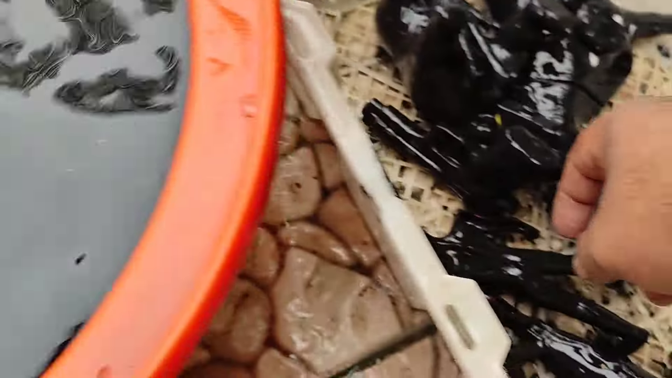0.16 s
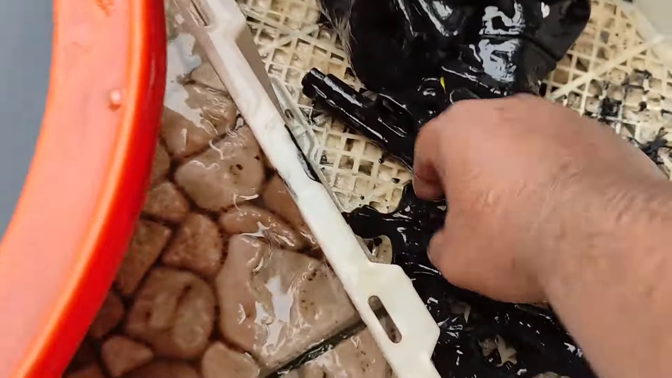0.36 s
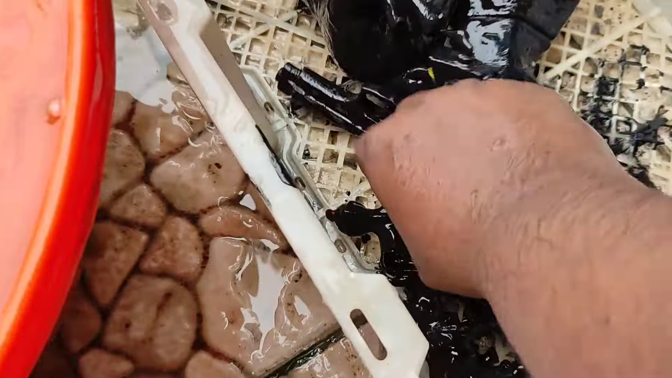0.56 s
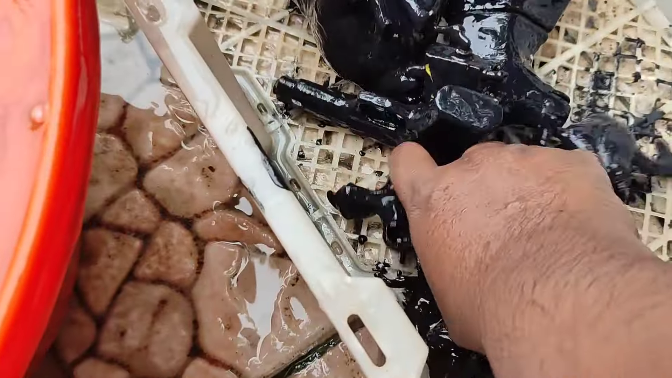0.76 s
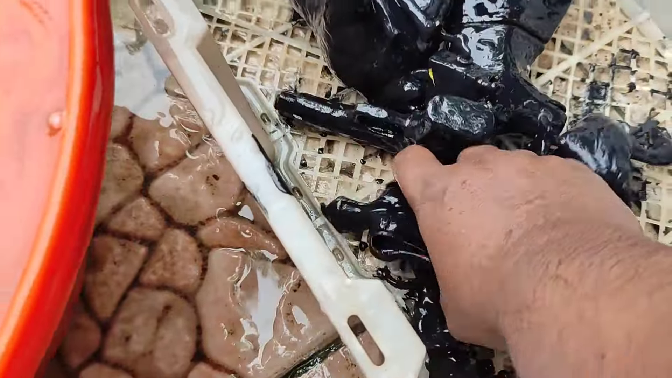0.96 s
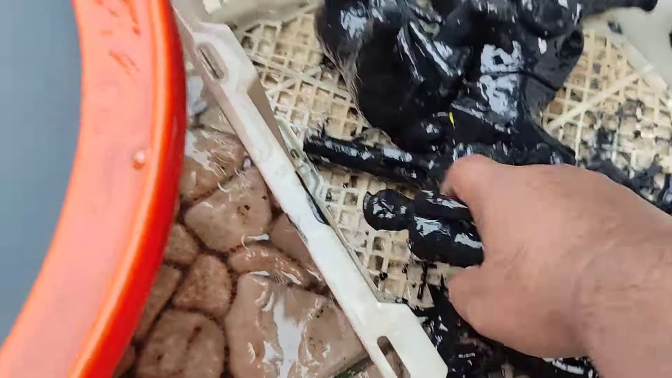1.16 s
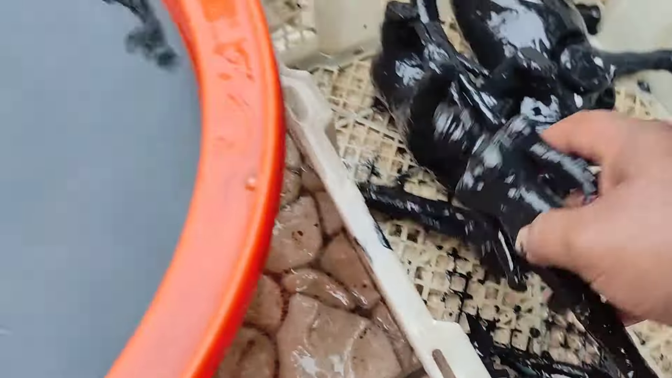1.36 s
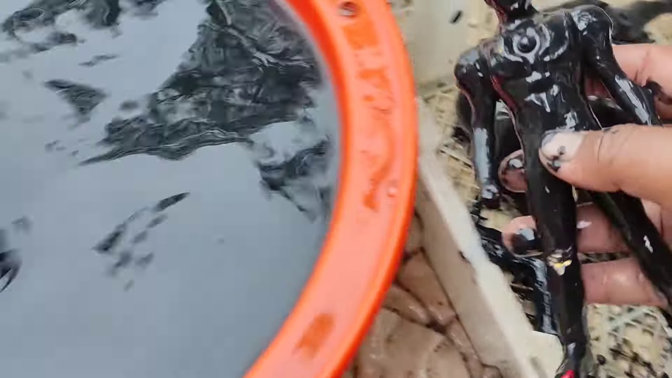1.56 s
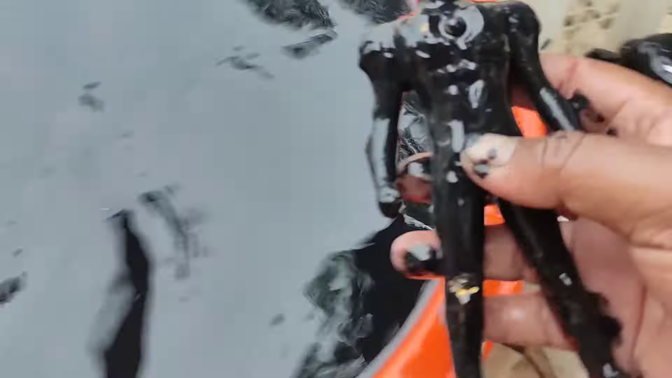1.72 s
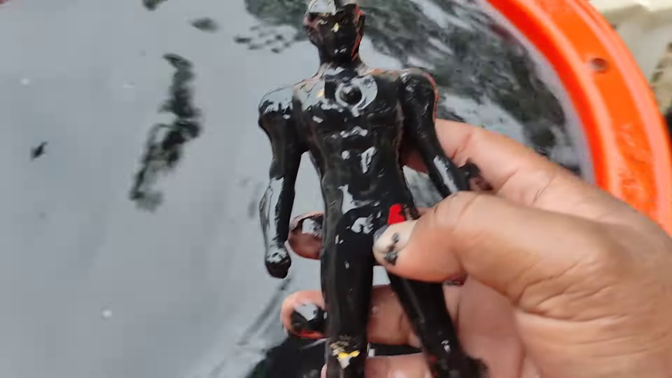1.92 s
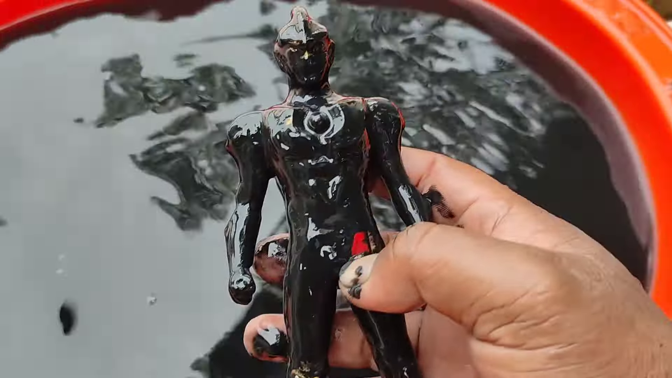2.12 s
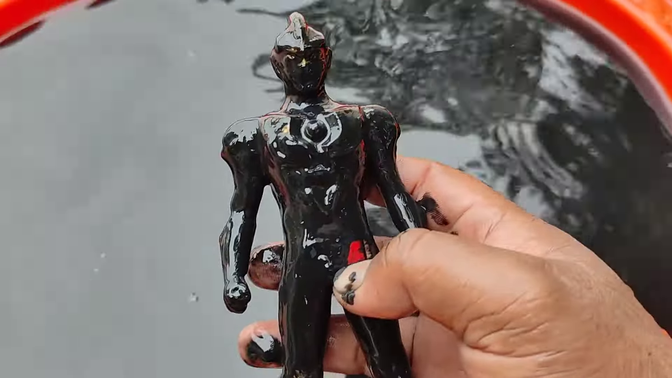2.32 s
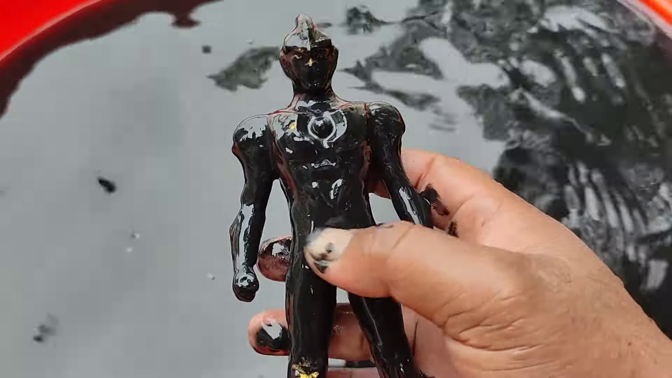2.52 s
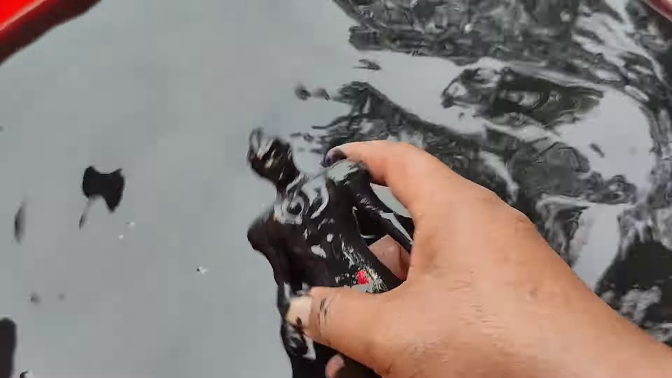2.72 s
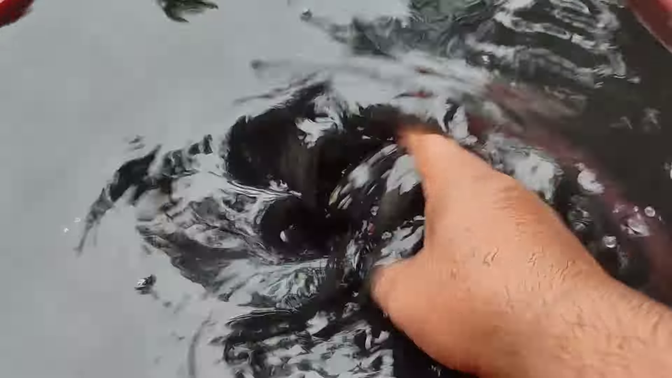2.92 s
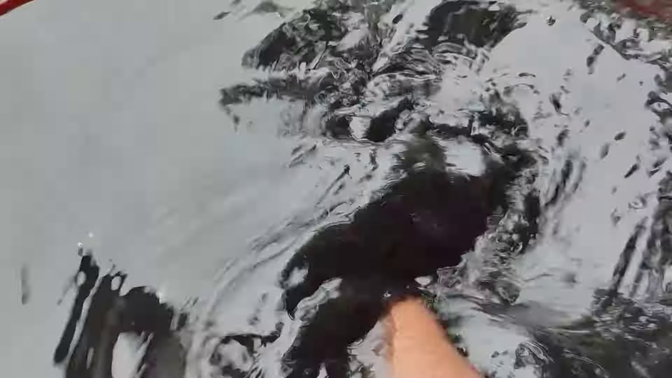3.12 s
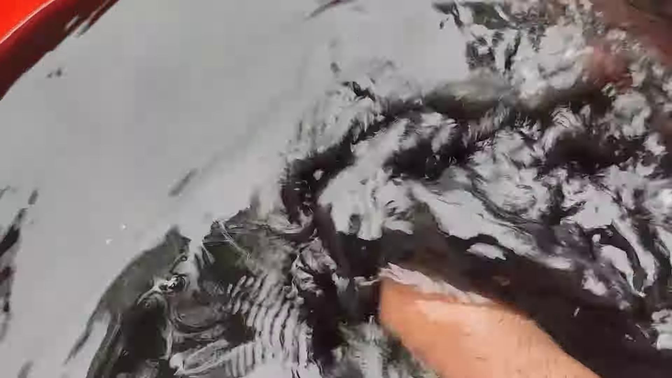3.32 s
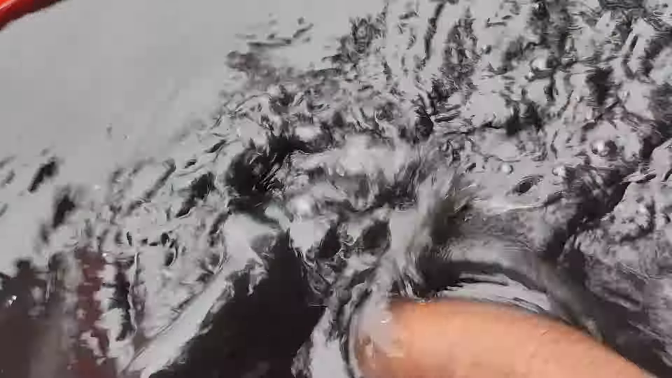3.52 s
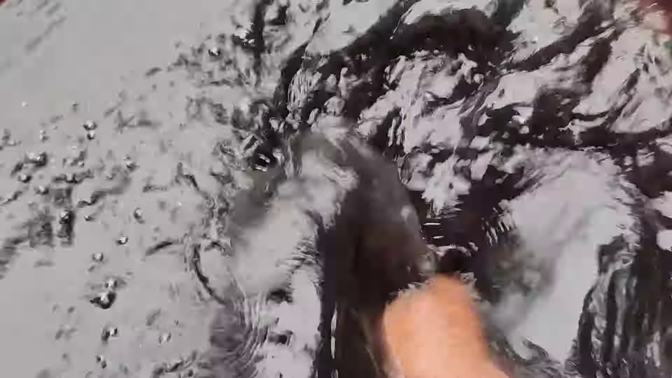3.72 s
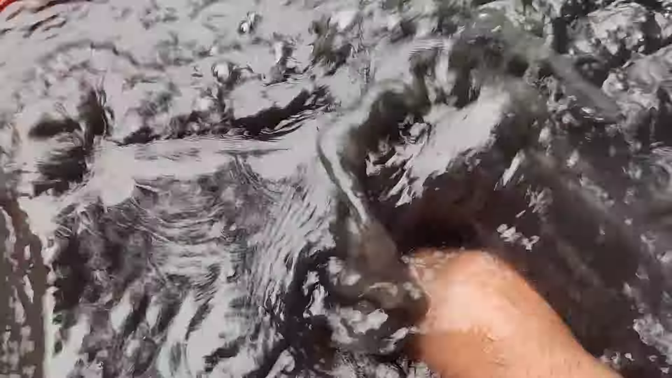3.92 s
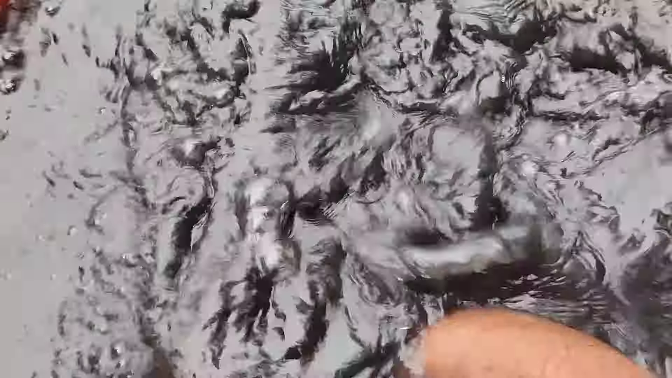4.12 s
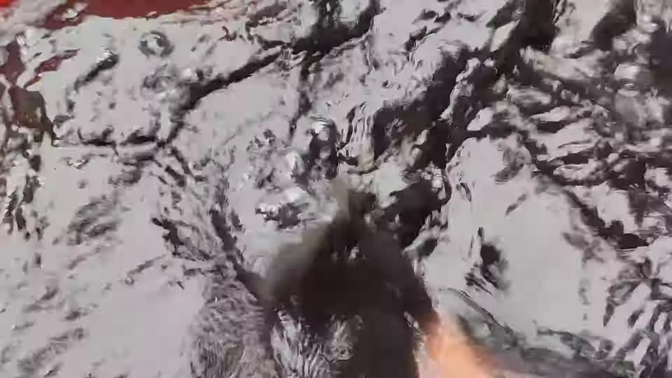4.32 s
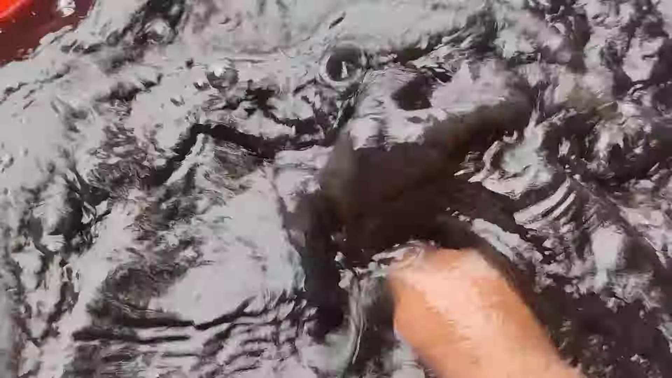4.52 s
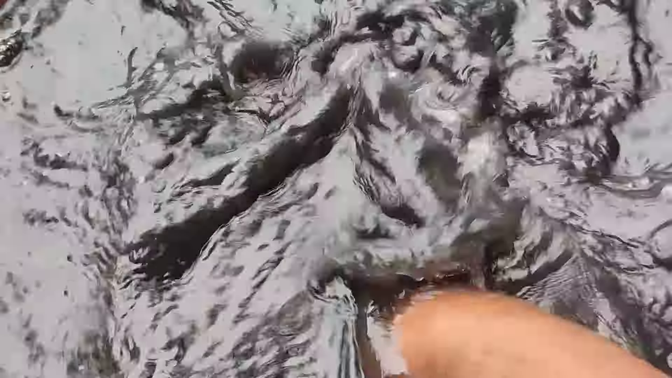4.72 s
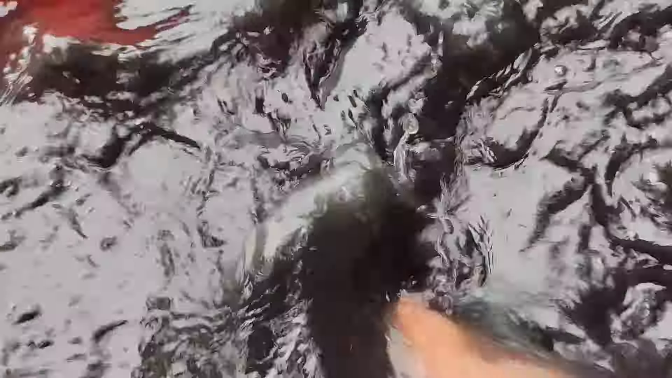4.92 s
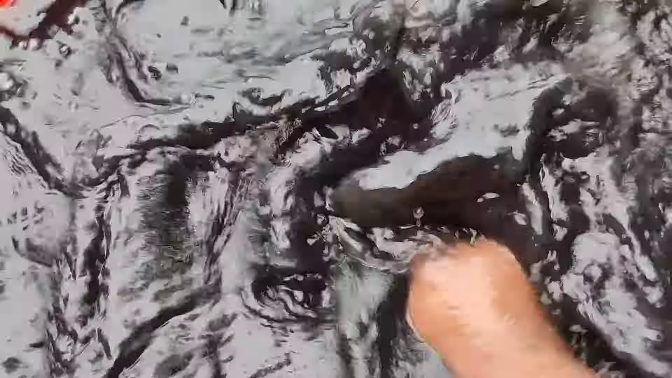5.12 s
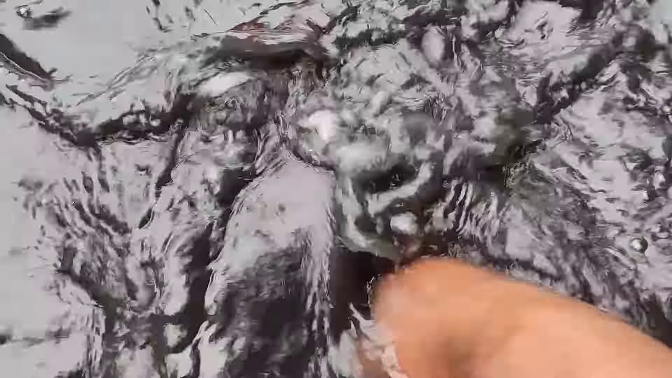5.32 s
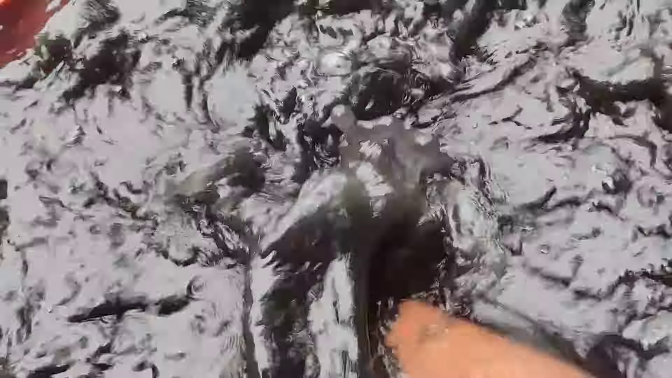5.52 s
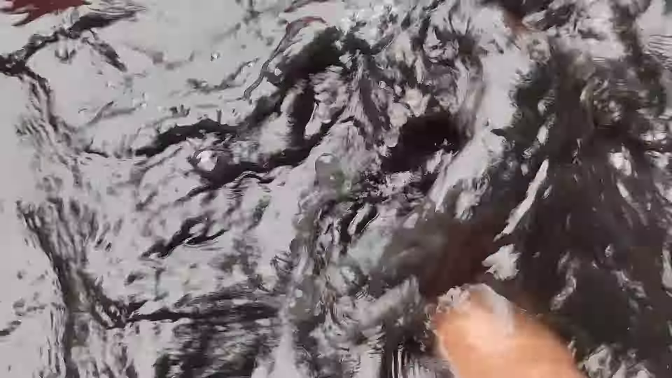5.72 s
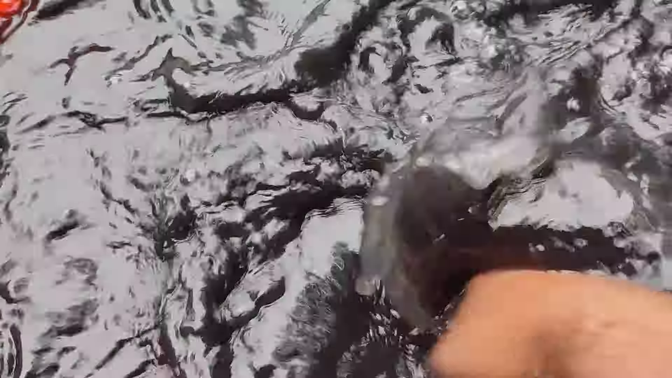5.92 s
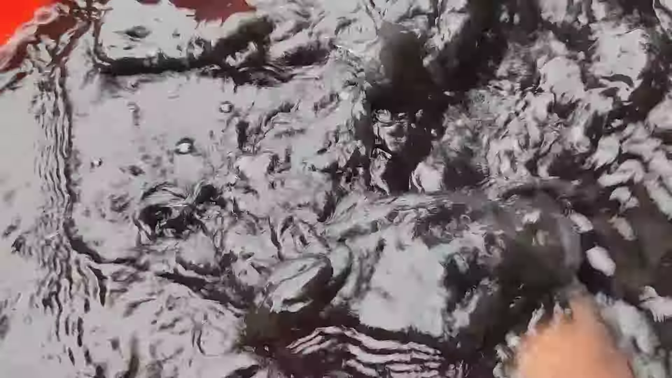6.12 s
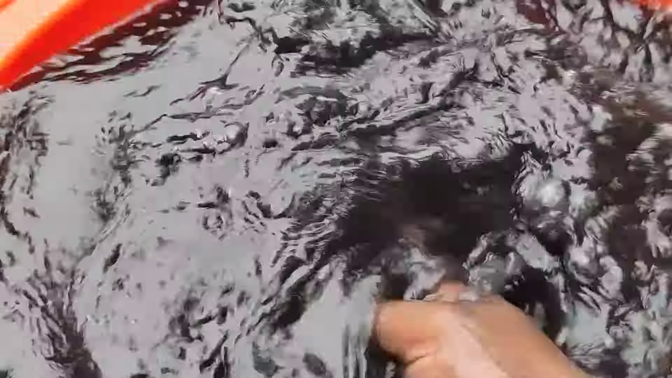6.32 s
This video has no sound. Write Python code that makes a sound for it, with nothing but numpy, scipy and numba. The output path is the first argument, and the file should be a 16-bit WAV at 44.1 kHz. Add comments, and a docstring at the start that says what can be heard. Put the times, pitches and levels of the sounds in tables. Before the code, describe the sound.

A wet plastic toy scrapes and knocks out of a crate, then is vigorously swished through a basin of water with splashes and bubbling gurgles.

```python
"""Wet toy, crate and basin

A hand lifts a wet plastic toy out of a crate, which scrapes and knocks as decaying modes, then swishes it
through a basin: trapped air rings as gliding sines, droplets tick as noise bursts, spray fizzes as tiny grains.
Outdoors: low town rumble of banded noise, a far engine of sine orders pulling away, faint whistling birds.
Two close ports hear it with differences in level that change strongly with frequency, and small delays."""
import sys
import numpy as np
from scipy import signal
from scipy.io import wavfile
from scipy.ndimage import map_coordinates
from numba import njit

SR = 44100
rng = np.random.default_rng(int(sys.argv[2]) if len(sys.argv) > 2 else 0)


def unload_wav(signal):
    """Save mono or channel-first audio to the path in sys.argv[1] as 16-bit WAV at rate SR, clipped to [-1, 1]."""
    wavfile.write(
        sys.argv[1],
        SR,
        np.round(np.clip(np.atleast_2d(signal).T, -1, 1) * 32767).astype(np.int16),
    )


N = 284930

# large air pockets: start_s, level_db, pitch_hz, glide_octaves_per_s, ring_cycles (to fall 20 dB)
POCKETS = [(2.948, -27, 1210, -14, 6.5), (2.951, -32.5, 760, -3, 10), (2.994, -32, 1330, -5, 18),
           (3.037, -30, 2260, 9, 26), (3.059, -21.5, 1505, 8, 17), (3.063, -26, 1000, 18, 32),
           (3.084, -21.5, 1180, 15, 38), (3.096, -29, 1540, 16, 18), (3.098, -34, 680, -18, 5),
           (3.118, -36, 744, 0, 5), (3.187, -32.5, 815, -6, 13), (3.189, -27.5, 2230, 2, 10),
           (3.207, -27.5, 675, 5, 8), (3.23, -29.5, 793, -5, 27), (3.254, -30, 458, -37, 9),
           (3.267, -30, 700, 17, 21), (3.281, -39, 735, 19, 20), (3.405, -31, 1480, 2, 7),
           (3.452, -30, 357, 6, 20), (3.475, -17, 1000, 18, 20), (3.529, -33.5, 780, -14, 9),
           (3.531, -33, 2160, -3, 22), (3.576, -37.5, 645, 5, 22), (3.619, -20, 539, 19, 16),
           (3.777, -29.5, 1860, 46, 20), (3.814, -30, 1210, 1, 24), (3.831, -32, 617, 1, 14),
           (3.849, -26, 652, 35, 12), (3.853, -20.5, 1370, 22, 4.5), (3.927, -7, 623, 9, 17),
           (3.914, -26, 770, 3, 12), (3.947, -32, 1370, 35, 34), (3.968, -34, 620, 27, 9),
           (4.0, -22, 1700, 21, 25), (4.069, -20.5, 860, 12, 16), (4.07, -14.5, 1450, 45, 9.5),
           (4.127, -30.5, 683, 11, 22), (4.138, -26, 736, 8, 6), (4.264, -24, 860, 15, 10.5),
           (4.3, -46, 643, -3, 20), (4.344, -36.5, 960, 10, 15), (4.36, -36, 728, 22, 28),
           (4.362, -34, 1400, 8, 16), (4.398, -33, 890, 12, 4), (4.409, -35, 900, 10, 4),
           (4.619, -40, 1210, 6, 22), (4.685, -44, 930, -8, 32), (4.749, -38.5, 2140, 24, 22),
           (4.438, -30.5, 1990, 1, 15), (4.465, -43, 794, -2, 46), (4.515, -30, 1333, 10, 38),
           (4.641, -37.5, 910, -7, 31), (4.72, -37.5, 782, 9, 23), (4.822, -25, 1000, 31, 12.5),
           (4.845, -34, 1500, 9, 30), (4.848, -34, 860, 13, 25), (4.906, -36.5, 1155, 5.5, 39),
           (4.995, -26.5, 732, 17, 15), (4.998, -23, 2600, 3, 8), (5.287, -20, 1470, 12, 5.5),
           (5.33, -34, 2580, 8, 23), (5.908, -26.5, 2100, 31, 21), (5.68, -30, 1840, 13, 10),
           (4.277, -34.5, 2220, 0, 30), (5.036, -21, 1710, 23, 15), (5.029, -25, 1350, 0.5, 11),
           (5.037, -13.5, 1267, -29, 19.5), (5.055, -32, 479, -11, 32), (5.06, -29, 970, 4, 36),
           (5.085, -34, 390, 21.5, 26), (5.118, -30, 1000, 31, 18), (5.118, -25.5, 1640, 25, 15),
           (5.23, -37, 756, 13.5, 27), (5.251, -29, 1700, 8, 17), (5.289, -18.5, 750, 26, 19.5),
           (5.357, -25, 370.4, 18, 17), (5.399, -21.5, 680, 16, 28), (5.405, -17, 718, 3, 13),
           (5.385, -24, 624, 16.5, 17), (5.42, -31, 757, 18, 18), (5.469, -26.5, 1585, -11, 24),
           (5.547, -24, 702, 73, 10), (5.552, -17, 1290, 32, 16), (5.563, -20, 459, 0.5, 10.5),
           (5.59, -28, 362, 4, 25), (5.651, -28.5, 872, -1.5, 19), (5.794, -36, 1000, 1, 11),
           (5.858, -30, 1480, 3, 5), (5.901, -18.5, 1075, -3.5, 28), (5.956, -26, 1780, -12, 21),
           (5.954, -27, 420, -6, 21.5), (6.007, -31.5, 1190, -11, 25), (6.107, -40.5, 1186, 9, 40),
           (6.37, -44, 500, 9.5, 37), (6.155, -33, 1940, 16, 24), (6.186, -34.5, 634, 7.5, 21),
           (6.252, -34.5, 1486, -3, 23), (6.255, -34.5, 704, -0.5, 52), (6.282, -27.5, 840, 14, 5),
           (6.294, -36, 1840, 18, 31), (6.302, -33, 464, 6, 22), (6.447, -33, 1250, 15.5, 25)]
# droplets and wet films that snap: start_s, level_db, centre_hz
SNAPS = [(0.7573, -36.5, 8600), (0.772, -29, 3020), (0.8508, -35, 4270), (0.884, -40, 3450),
         (1.092, -41, 3240), (1.137, -39, 3980), (1.151, -36, 4800), (1.1572, -33, 4400),
         (1.259, -52, 4470), (1.5413, -45, 3600), (1.5582, -39, 6400), (2.875, -40.5, 9300),
         (2.928, -30, 11350), (2.947, -34.5, 7060), (2.973, -30.5, 8800), (3.033, -34.5, 8200),
         (3.075, -41, 10620), (3.086, -22, 9700), (3.096, -19, 11700), (3.108, -19, 4670),
         (3.151, -24.5, 6200), (3.206, -26.5, 4040), (3.2473, -20.5, 6300), (3.254, -17, 5040),
         (3.263, -18.5, 3360), (3.446, -35, 4870), (3.461, -31.5, 4200), (3.474, -36, 9400),
         (3.522, -34.5, 9100), (3.532, -37, 8300), (3.617, -34, 3330), (3.622, -25, 8900),
         (3.8191, -30, 11000), (3.8503, -25.5, 8360), (3.8767, -30, 3630), (3.953, -25, 4400),
         (3.9607, -24, 4360), (4.001, -22.5, 9200), (4.0698, -23, 6500), (4.109, -44, 7740),
         (4.1603, -30.5, 6050), (4.233, -32, 8900), (4.25, -37, 8550), (4.2604, -27, 8270),
         (4.35, -29, 11400), (4.437, -38, 7500), (4.457, -34.5, 5200), (4.4868, -30.5, 7000),
         (4.515, -19.5, 8150), (4.529, -25.5, 5900), (4.604, -32, 6260), (4.613, -29, 5130),
         (4.692, -30.5, 4000), (4.802, -27, 10900), (4.81, -21.5, 9900), (4.822, -21, 11260),
         (4.909, -31, 4530), (4.996, -31, 3460), (5.0345, -29, 3580), (5.118, -19, 5570),
         (5.179, -26.5, 3130), (5.1903, -25.5, 8850), (5.213, -26, 8600), (5.2546, -24, 11300),
         (5.284, -27, 3820), (5.3557, -29, 9400), (5.399, -22.5, 8850), (5.407, -25, 4020),
         (5.525, -33, 8150), (5.581, -21, 8700), (5.5934, -28, 4350), (5.661, -30, 10600),
         (5.697, -14.5, 4500), (5.706, -24, 9300), (5.774, -34, 6010), (5.837, -31, 9000),
         (5.8818, -26.5, 11700), (5.904, -29.5, 8700), (5.954, -11, 10000), (6.133, -32.5, 2930),
         (6.142, -28.5, 7700), (6.182, -20, 4340), (6.192, -27, 4000), (6.201, -32, 7900),
         (6.243, -31.5, 2980), (6.279, -26.5, 4930), (6.315, -24, 9700)]
# level balance of the two ports: frequency_hz, left_minus_right_db
PORT_TILT = [(300, -5), (700, -0.2), (1300, -4), (2400, -2.2), (4400, -11.5), (8100, -23), (11500, 2.5),
             (15000, 25)]
LEFT_LAG_MS = 0.11   # usual delay of the left port


def from_db(db):
    """Decibels to gain."""
    return 10 ** (np.asarray(db) / 20)


def rms_one(x):
    """Scales to unit rms."""
    return x / np.sqrt(np.mean(x ** 2) + 1e-20)


def in_time(rows):
    """Draws the columns of a breakpoint curve per sample; -120 outside its span."""
    s, *columns = np.transpose(rows)
    return [np.interp(np.arange(N) / SR, s, c, left=-120, right=-120) for c in columns]


def at_hz(points, hz):
    """Reads a spectrum on a log frequency axis."""
    points_hz, values = np.array(points)[:, 0], np.array(points)[:, 1]
    return np.interp(np.log(hz), np.log(np.maximum(points_hz, 1)), values)


def drift(rate_hz):
    """Slow random wander of spread 1: noise through two equal one-pole lowpasses."""
    step = 40   # samples between the points of the wander
    r = np.exp(-2 * np.pi * rate_hz * step / SR)
    white = rng.standard_normal(N // step + 2002)
    slow = signal.lfilter([1], [1, -2 * r, r * r], white)[2000:]   # drops the run-in
    return np.interp(np.arange(N) / step, np.arange(len(slow)), rms_one(slow))


@njit
def add(out, s, left, right, hz, glide, swell, fall, lag, bend, rate):
    """Adds gliding sines that swell linearly, then fall 20 dB in the fall time; lag delays the left."""
    for k in range(len(s)):
        first = int(s[k] * rate)
        last = min(first + int((swell[k] + 2.5 * fall[k]) * rate) + 8, out.shape[1])
        w, g = 2 * np.pi * hz[k], glide[k] * np.log(2) + 1e-6
        for i in range(first, last):
            for c in range(2):
                t = (i - first) / rate - (lag[k] if c == 0 else 0.)
                if t > 0:
                    # a bend above 1 makes the fall ever faster
                    shape = t / swell[k] if t < swell[k] else 10 ** -(((t - swell[k]) / fall[k]) ** bend)
                    gain = left[k] if c == 0 else right[k]
                    out[c, i] += gain * shape * np.sin(w * np.expm1(g * t) / g)


def chirps(s, db, hz, glide, swell_ms, fall_ms, pan_db, lag_ms=LEFT_LAG_MS, bend=1):
    """Stereo tones gliding exponentially in pitch, one per row of the columns."""
    out = np.zeros((2, N))
    left, right = from_db(db + pan_db / 2), from_db(db - pan_db / 2)
    swell = np.maximum(swell_ms + 0 * s, .02) / 1000   # + 0 * s spreads a single value over all rows
    fall = np.maximum(fall_ms, .3) / 1000
    add(out, s, left, right, hz, glide + 0 * s, swell, fall, (lag_ms + 0 * s) / 1000, float(bend), SR)
    return out


def banded_noise(spectrum, alike_at, patchy_db, rate, lag):
    """Half-octave bands of stereo noise, each with its own level, flicker and left-right likeness; rms 1."""
    out, together = 0, drift(rate)
    edges = 22 * 2 ** np.arange(0, 9.8, .5)
    white = rng.standard_normal((2, 2, N))
    for k, (low, high) in enumerate(zip(edges, edges[1:])):
        band = signal.butter(2, [low, high], "band", fs=SR, output="sos")
        mid, side = signal.sosfilt(band, white[k % 2])
        hz = np.sqrt(low * high)
        alike = np.clip(alike_at(hz), -1, 1)
        flicker_db = patchy_db * (.85 * together + .55 * drift(rate))
        stereo = np.sqrt(1 + alike) * mid + np.sqrt(1 - alike) * side * [[1], [-1]]
        out = out + from_db(at_hz(spectrum, hz) + flicker_db) * stereo
    out[0] = np.roll(out[0], lag)   # left late by this many samples
    return rms_one(out)


def swarm(level_db, per_s, low_hz, high_hz, cycles, rise, size_db, clump_db, spectrum=((1, 0), (2, 0))):
    """Random ringing grains in clumps; pitch mostly rises as each rings from its own spot."""
    sounding = level_db > -95
    chance = per_s * from_db(clump_db * drift(25)) / SR
    born = np.flatnonzero((rng.random(N) < chance) & sounding)
    u, n = rng.random((len(born), 3)).T, rng.standard_normal((len(born), 3)).T
    hz = low_hz * (high_hz / low_hz) ** u[0]
    fall_ms = 1000 * cycles * (0.48 + 1.63 * u[1]) / hz
    size = size_db * np.minimum(-np.log(u[2] + 1e-9), 4)   # many small, few large
    size = size + at_hz(spectrum, hz) + 10 * np.log10(hz / fall_ms)
    glide = rise * (1 + n[0]) * 1000 / fall_ms   # rise is in octaves per ring time
    pan_db, lag_ms = at_hz(PORT_TILT, hz) + 6.6 * n[1], LEFT_LAG_MS + 0.097 * n[2]
    grains = chirps(born / SR, size, hz, glide, 300 / hz, fall_ms, pan_db, lag_ms)
    return from_db(level_db) * grains / np.sqrt(np.mean(grains[:, sounding] ** 2) + 1e-20)


def town():
    """Low rumble: gently flickering noise bands whose left-right likeness changes with frequency."""
    # colour of the rumble: frequency_hz, relative_level_db
    colour = [(18, -51), (30, -23.5), (125, 3), (242, 0), (562, -17.5), (1380, -24), (1620, -25),
              (2280, -31), (4650, -34.5), (5590, -51.5), (8310, -23.5), (9990, -45), (10800, -43),
              (13700, -41), (16500, -78)]
    # how alike the ports hear it: frequency_hz, likeness (-1 to 1)
    likeness = [(60, 0.8), (180, 1), (550, -0.000015), (1650, -0.28), (4970, 0.13), (15000, -0.083)]
    rumble = banded_noise(colour, lambda hz: at_hz(likeness, hz), patchy_db=.5, rate=4, lag=0)
    return rumble * from_db(-47.5)


def birds():
    """Thin gliding whistles, wavering in pitch and level, smeared by dense scattered echoes."""
    # far calls: start_s, level_db, pitch_hz, glide_octaves_per_s, length_ms
    call_table = [(0.075, -68, 7670, -2, 95), (0.134, -66, 4890, -0.9, 200), (.32, -65, 7850, -4, 95),
                  (1.06, -67, 7600, -7, 64), (1.27, -71, 2480, -1.5, 71), (1.29, -58.5, 2133, -0.3, 153),
                  (1.4, -60, 1710, -4, 46), (1.46, -69, 2050, -1, 70), (1.47, -69, 7560, -1, 190),
                  (1.508, -51.5, 1726, -0.8, 130), (1.6, -59, 1542, -1.5, 76), (1.66, -64, 1620, 0.5, 110),
                  (1.82, -70, 2120, -0.5, 64), (1.87, -69.5, 7550, -2, 140), (2.031, -71, 2440, 1.5, 130),
                  (2.11, -69, 1690, 1.5, 180), (2.209, -67, 1857, -2, 140), (2.41, -65, 7500, -2, 130),
                  (2.59, -75.5, 3460, 0, 270), (2.72, -71, 7500, 1, 77)]
    swell_share = 0.17   # of a call's length
    waver_s = 0.0001   # spread of the time shifts
    echo_t60_s, echo_db = 0.32, 1.5
    s, db, hz, glide, ms = np.transpose(call_table)
    calls = chirps(s, db, hz, glide, swell_share * ms, (1 - swell_share) * ms, 0, lag_ms=0.037, bend=2.2)
    calls *= from_db(4.5 * drift(50))
    warp = np.arange(N) + waver_s * SR * drift(25)   # uneven time makes the pitch waver
    calls = np.array([map_coordinates(c, [warp], order=3) for c in calls])
    t = np.arange(SR // 2) / SR
    tail = rng.standard_normal((2, len(t))) * from_db(-60 * t / echo_t60_s)
    tail *= from_db(echo_db) / np.sqrt(np.sum(tail ** 2, axis=1, keepdims=True))
    return calls + signal.fftconvolve(calls, tail, axes=1)[:, :N]


def drags():
    """Body and crackle levels in dB: each drag rises, holds and lets go."""
    # toy dragged over the crate: start_s, length_s, body_db, wet_crackle_db
    drag_table = [(0.704, 0.22, -52, -50), (1.029, 0.16, -64.5, -56.5), (1.251, 0.044, -62.5, -65.5),
                  (1.71, 0.075, -74, -66.5)]
    attack_db_per_s, release_db_per_s = 401.5, 447.5
    t = np.arange(N) / SR
    body, crackle = np.full((2, N), -120.)
    for s, length, body_db, crackle_db in drag_table:
        before, after = (s - t) * attack_db_per_s, (t - s - length) * release_db_per_s
        off = np.maximum(0, np.maximum(before, after))
        body, crackle = np.maximum(body, body_db - off), np.maximum(crackle, crackle_db - off)
    return body, crackle


def crate():
    """Knocks and dense scrape clicks excite the same decaying modes; a wet film crackles along."""
    # knocks on the crate: start_s, level_db, favoured_pitch_hz
    knock_table = [(0.664, -44, 920), (0.683, -49, 920), (0.691, -41, 840), (0.704, -35, 835),
                   (0.731, -31, 500), (0.773, -12, 1160), (0.786, -25.5, 460), (0.85, -32.5, 504),
                   (0.886, -37, 900), (1.064, -38, 2010), (1.071, -42, 800), (1.096, -31.5, 330),
                   (1.137, -33, 800), (1.153, -32, 603), (1.228, -40.5, 855), (1.26, -40, 830),
                   (1.54, -26.5, 606)]
    # modes of the crate: pitch_hz, relative_level_db, t60_s
    mode_table = [(250, 5, 0.15), (408, 6, 0.11), (500, 5, 0.021), (750, 1.5, 0.04), (860, 6.5, 0.021),
                  (1000, -14, 0.049), (1250, -3, 0.045), (1700, 2, 0.028), (2270, -7, 0.013),
                  (2720, -1, 0.011)]
    focus_db = 3.5   # loss one octave from the favoured pitch
    crack_db, crack_ms = -14, 1.2   # bright snap of the contact
    s, db, favoured_hz = np.transpose(knock_table)
    body_db, crackle_db = drags()
    clicks = (rng.random((2, N)) < 1500 / SR) * rng.standard_normal((2, N))
    scrape = clicks * from_db(body_db - 9.5 + 1.2 * drift(46))
    scrape[1] = 1.2 * scrape[0] + .5 * scrape[1]   # the ports share most of it
    out = np.zeros((2, N))
    for hz, mode_db, t60 in mode_table:
        u = rng.standard_normal((len(s), 3)).T
        strength = db + mode_db - 7 - focus_db * np.log2(hz / favoured_hz) ** 2 + 1.3 * u[0]
        # start and pitch of each mode vary slightly at random per knock
        struck_s, struck_hz = s + .0009 * np.abs(u[1]), hz * (1 + .045 * u[2])
        out += chirps(struck_s, strength, struck_hz, 0, .4, t60 * 1000 / 3 + 0 * s, -3)
        # the scrape drives a two-pole resonator on the mode
        r, w = from_db(-60 / (t60 * SR)), 2 * np.pi * hz / SR
        rubbed = signal.lfilter([0, np.sin(w)], [1, -2 * r * np.cos(w), r * r], scrape + 1e-18)
        out += from_db(mode_db + 5.5 - 12.5 * np.log2(hz / 850) ** 2) * rubbed
    for hz in np.geomspace(1900, 9000, num=7):   # the contact itself cracks
        u = rng.standard_normal((len(s), 2)).T
        strength = db + crack_db - 9.0 * np.log2(hz / 1900) + 3 * u[0]
        out += chirps(s, strength, hz * (1 + 0.035 * u[1]), 0, 0.12, crack_ms + 0 * s, -16.0)
    return out + swarm(crackle_db, 5000, 1830, 11700, cycles=2.5, rise=0.02, size_db=4.0, clump_db=2.5,
                       spectrum=((1500, -4.0), (8000, -28.0), (15000, -12)))


def ticks():
    """Each wet snap is a noise burst, coloured around its centre, with a spatter tail."""
    length = 4000   # samples
    snap_cycles = 13.5   # time scale of a snap in cycles of its centre
    out, t_ms = np.zeros((2, N + length)), np.arange(length) / SR * 1000
    noise = rng.standard_normal((len(SNAPS), 2, length))
    wide = signal.butter(1, [2200, 14000], "band", fs=SR, output="sos")
    for (s, db, hz), (shared, own) in zip(SNAPS, noise):
        ms = 1000 * snap_cycles / hz
        rise = np.minimum(t_ms / (0.68 * ms), 1) ** 2
        snap_fall = from_db(-18.0 * np.maximum(t_ms / ms - .6, 0))
        spatter = from_db(-18.5 - 0.49 * t_ms)
        # the left port gets noise of its own over the shared burst, 5 samples late
        burst = rise * (snap_fall + spatter) * np.array([np.roll(shared, 5) + 3.78 * own, shared])
        narrow = signal.butter(1, [hz / 1.102, min(hz * 1.02, 20000)], "band", fs=SR, output="sos")
        core = signal.sosfilt(narrow, burst) * np.sqrt(9000 / hz) * 1.08
        burst = core + 0.36 * signal.sosfilt(wide, burst)
        pan_db = at_hz(PORT_TILT, hz)
        first = int(s * SR)
        out[:, first:first + length] += from_db(db + np.array([[pan_db / 2], [-pan_db / 2]])) * burst
    return out[:, :N]


def engine():
    """Far engine: sines on low orders of one turning rate, each wavering in level."""
    # one curve before and one after a gear change: time_s, seventh_order_hz, level_db
    gears = [
        [(2.6, 219.3, -76), (2.724, 236.6, -55.5), (3.92, 244.4, -56)],
        [(3.85, 263, -62), (4.02, 226.3, -60), (6.46, 250, -59.5)],
    ]
    # order (multiple of a seventh of that line), relative_level_db
    order_table = [(2, -2.5), (4, 6), (5, -9), (7, 5)]
    out = np.zeros(N)
    for gear, orders in zip(gears, (order_table[-1:], order_table)):   # at first only the seventh order carries
        hz, db = in_time(gear)
        turns = np.cumsum(hz) / SR / 7
        for order, order_db in orders:
            gain = np.sqrt(2) * from_db(db + order_db + 2.4 * drift(5.3))
            out += gain * np.sin(2 * np.pi * order * turns)
    return out


def spray():
    """Level of the spray in dB: the swishing plus a brief fizz at each wet snap."""
    # vigour of the swishing: time_s, level_db
    swish_table = [(2.85, -85), (2.87, -79), (2.91, -61), (3.04, -56), (3.06, -44.5), (3.11, -44),
                   (3.13, -56), (3.235, -56), (3.25, -39), (3.30, -52), (3.36, -59), (3.6, -60),
                   (3.65, -59.5), (3.8, -56.5), (3.865, -76), (3.88, -43.5), (3.97, -36.5), (4.0, -48),
                   (4.065, -45.5), (4.085, -55), (4.11, -42.5), (4.17, -50), (4.24, -51.5), (4.255, -36.5),
                   (4.29, -53), (4.45, -57), (4.58, -53.5), (4.79, -50), (4.83, -39.5), (4.98, -54.5),
                   (5.03, -43), (5.19, -45), (5.45, -47), (5.52, -47.5), (5.56, -40), (5.73, -49),
                   (5.84, -51.5), (5.94, -48.5), (6.1, -53), (6.2, -44), (6.32, -48.5), (6.46, -46)]
    fizz_follows, fizz_db, fizz_s = 0.57, -32.5, 0.005   # share of the snap's dB, offset, time constant
    swish_db, = in_time(swish_table)
    swishing = swish_db > -95
    s, db = np.transpose(SNAPS)[:2]
    kicks = np.zeros(N)
    np.add.at(kicks, (s * SR).astype(int), from_db(fizz_db + fizz_follows * db) ** 2)
    t = np.arange(-4000, 4001) / SR
    fizz_shape = np.exp(-np.abs(t) / fizz_s)
    fizz_power = signal.fftconvolve(kicks * swishing, fizz_shape, "same").clip(0)
    return np.where(swishing, 10 * np.log10(fizz_power + from_db(swish_db) ** 2), swish_db)


def slaps():
    """A flat slap is a few cycles of three squeezed air gaps at once."""
    # slaps of hand and toy on the surface: start_s, level_db, lowest_ring_hz
    slap_table = [(2.919, -21, 853), (2.973, -31.5, 524), (2.993, -19.5, 1400), (3.075, -19.5, 1360),
                  (3.187, -43, 806), (3.265, -17.5, 783), (3.473, -31, 1000), (3.619, -19, 1150),
                  (5.546, -19, 1260), (5.591, -22.5, 716), (5.9, -14, 1370), (5.954, -20, 647)]
    s, db, hz = np.transpose(slap_table)
    return sum(chirps(s, db - 2 * k, hz * 1.65 ** k, 0, .2, 3000 / hz, -1.5) for k in range(3))


def pockets():
    """Big bubbles ring as gliding sines, with a slight shared random wobble in level."""
    # delay between the ports: frequency_hz, left_late_ms
    port_lag = [(400, 0.07), (700, 0.13), (1100, 0.21), (1600, 0.075), (2200, 0.11), (3200, 0.11)]
    swell_share = 0.015   # of a pocket's ring time
    pop_db = -7   # short click as each pocket starts
    s, db, hz, glide, cycles = np.transpose(POCKETS)
    fall_ms = 1000 * cycles / hz
    u = rng.standard_normal((len(s), 2)).T
    pan_db, lag_ms = at_hz(PORT_TILT, hz) + 3.4 * u[0], at_hz(port_lag, hz) + 0.044 * u[1]
    rings = chirps(s, db, hz, glide, swell_share * fall_ms, fall_ms, pan_db, lag_ms, bend=1.7)
    rings += chirps(s, db + pop_db, hz * 1.9, 0, 0.3, 1500 / hz, pan_db, lag_ms)
    # each sheds two smaller, higher bubbles that ring for about seven of the pocket's cycles
    for n in rng.standard_normal((len(s), 2, 3)).transpose(1, 2, 0):
        shed_s, shed_db = s + .012 * np.abs(n[0]), db - 16.0 + 3 * n[1]
        shed_hz = hz * (1.6 + .3 * n[2]).clip(1, 3)
        rings += chirps(shed_s, shed_db, shed_hz, glide, 1, 7000 / hz, pan_db, lag_ms)
    return rings * from_db(1.1 * drift(60))


def churn(spray_db):
    """Level of the small bubbles in dB: a dying trail after each pocket over a share of the spray."""
    follows, trail_db, under_spray_db = 0.73, -23, -13.5   # share of the pocket's dB, offsets
    delay_s, fall_s = 0.0067, 0.028   # the trail starts as the pocket breaks up; time constant in power
    s, db = np.transpose(POCKETS)[:2]
    kicks = np.zeros(N)
    first = ((s + delay_s) * SR).astype(int).clip(0, N - 1)
    np.add.at(kicks, first, from_db(trail_db + follows * db) ** 2)
    trail = signal.lfilter([1], [1, -np.exp(-1 / (fall_s * SR))], kicks)
    return 10 * np.log10(trail + from_db(spray_db + under_spray_db) ** 2)


def water():
    """Air pockets, slaps, small bubbles and spray under the strokes."""
    # colour of the spray: frequency_hz, relative_level_db (density, per Hz)
    colour = [(710, -20), (1200, -8), (1600, -8), (2500, -12), (5330, -10), (7170, -21), (8730, -6.5),
              (10100, -17.5), (12000, 12), (13500, -16), (15100, -38), (16500, -45)]
    spray_db = spray()
    gurgle = swarm(churn(spray_db), 900, 420, 2600, cycles=11.0, rise=0.15, size_db=3.8, clump_db=4.0,
                   spectrum=((450, -17.5), (800, -5), (2400, -18.0)))
    drips = swarm(spray_db - 1.5, 450, 2022, 11100, cycles=25.0, rise=0.066, size_db=3.0, clump_db=5.5,
                  spectrum=colour)
    fizz = swarm(spray_db - 10.0, 2500, 1100, 14700, cycles=1.0, rise=0.09, size_db=9.0, clump_db=4.0,
                 spectrum=colour)
    hiss = banded_noise(colour, lambda hz: .3, patchy_db=4.2, rate=45, lag=4)
    hiss *= from_db(spray_db + 3.0)
    return pockets() + slaps() + gurgle + drips + fizz + hiss


def scene():
    """Everything at the two ports; close sounds are kept above 150 Hz."""
    no_bass = signal.butter(2, 150, "high", fs=SR, output="sos")
    close = signal.sosfilt(no_bass, water() + crate() + ticks())
    return close + birds() + engine() + town()


def record(dry):
    """Top treble fades above about 15 kHz, then is cut steeply."""
    fade = signal.butter(N=6, Wn=15200, fs=SR, output="sos")
    cut = signal.cheby2(12, 50, 16600, fs=SR, output="sos")   # 50 dB down from 16600 Hz
    return signal.sosfilt(cut, signal.sosfilt(fade, dry))


dry = scene()
out = record(dry)
unload_wav(out)
```